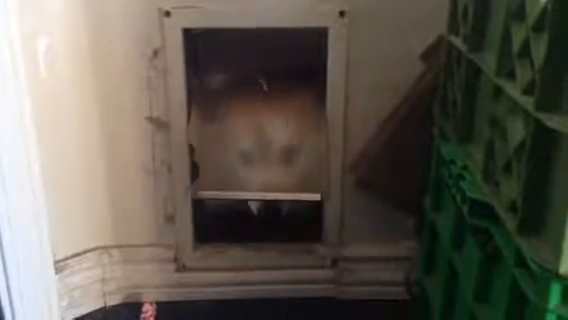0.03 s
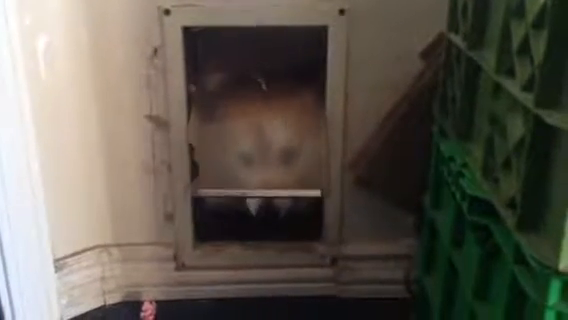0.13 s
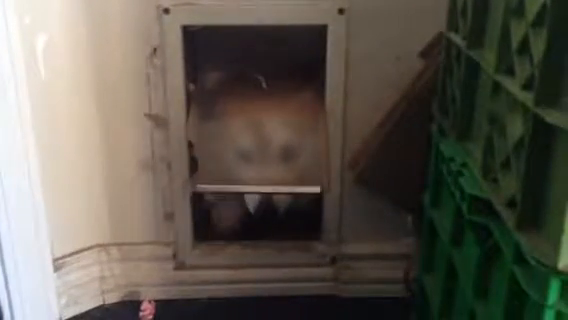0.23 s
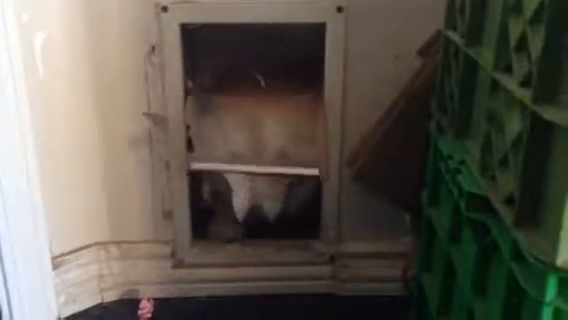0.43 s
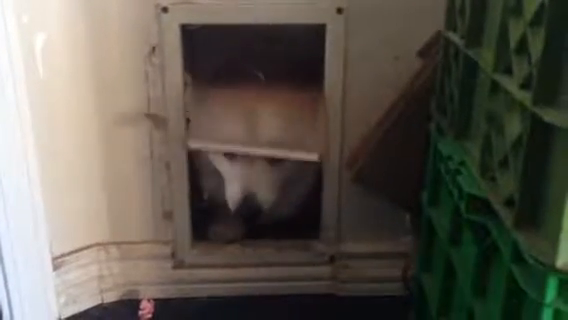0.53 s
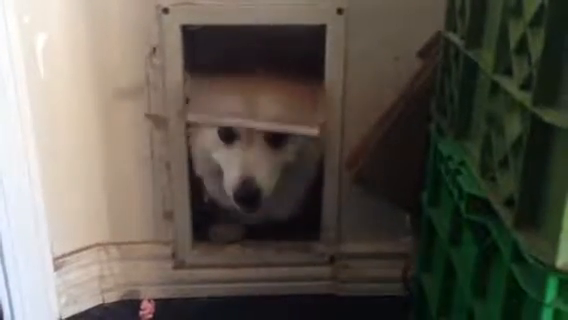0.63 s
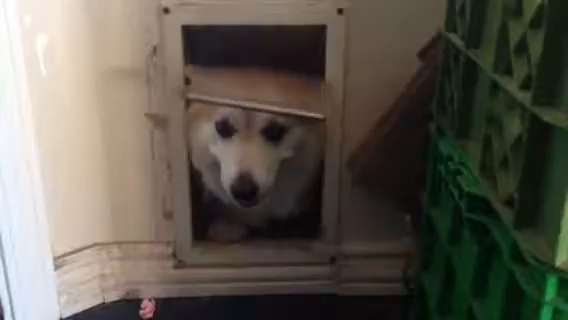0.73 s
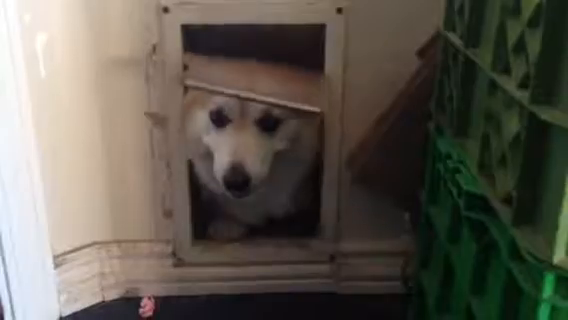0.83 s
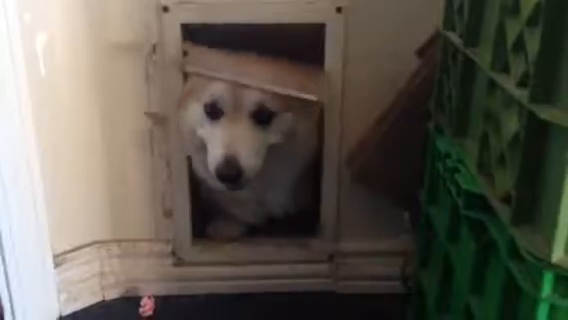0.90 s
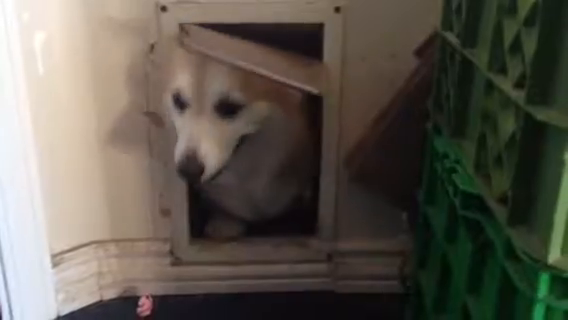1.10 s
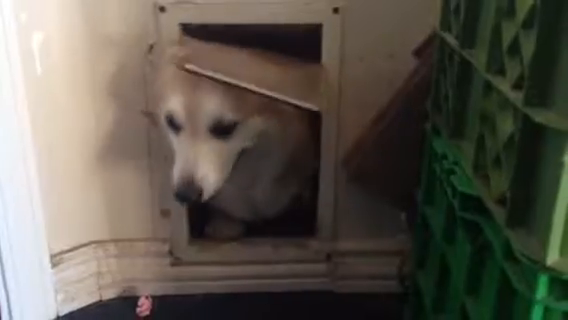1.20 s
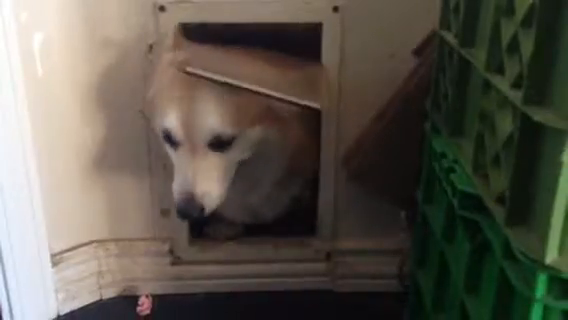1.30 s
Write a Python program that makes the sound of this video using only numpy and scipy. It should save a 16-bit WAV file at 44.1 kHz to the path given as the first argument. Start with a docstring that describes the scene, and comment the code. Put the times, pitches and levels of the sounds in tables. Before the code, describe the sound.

A plastic pet door clacks close by in a small hallway as a dog pushes through. Quick clicks build to a bright snap at 0.25 seconds, then a hard clack comes at 0.4. Lighter rattles, soft thuds and fur brushes follow until about 1.3 seconds. A distant crow gives two faint, raspy caws, near 0.3 and 0.8 seconds, over very quiet outdoor air.

```python
"""A dog pushes its head through a plastic pet door in a small hallway, over faint outdoor air.
The flap ticks, fur brushes the frame, the door panel thuds, and the catch snaps free (0.24 s).
A distant crow starts a rasping caw; the flap clacks on its frame (0.37 s) and rattles as the dog
bumps the panel again. The crow caws once more (0.84 s), and the last soft bumps and brushes follow."""
import sys
import numpy as np
from scipy import signal
from scipy.fft import rfft, irfft
from scipy.io import wavfile
from scipy.ndimage import uniform_filter1d

SR = 44100
rng = np.random.default_rng(int(sys.argv[2]) if len(sys.argv) > 2 else 0)


def master_out(mix):
    """Clip the mix to full scale and print it as 16-bit PCM to the path in sys.argv[1]."""
    frames = np.transpose(np.atleast_2d(mix))
    ceiling = np.clip(frames, -1, 1)
    pcm = np.round(ceiling * 32767).astype(np.int16)
    wavfile.write(sys.argv[1], SR, pcm)


N = 59535


def amp(db):
    """Decibels to gain."""
    return 10 ** (np.asarray(db) / 20)


def unit_rms(x):
    """Normalises to an rms of one."""
    return x / np.sqrt(np.mean(x ** 2) + 1e-20)


def curve_at(points, hz):
    """Reads a curve on a log-frequency axis."""
    f, value = np.transpose(points)
    return np.interp(np.log(hz + 1), np.log(f + 1), value)


def add(mix, start_s, sound):
    """Drops a sound into the mix."""
    part = mix[max(round(start_s * SR), 0):][:len(sound)]
    part += sound[:len(part)]


def eq(x, curve, size=4096):
    """Minimum-phase EQ with unit power gain: the curve sets only the tone."""
    gain = unit_rms(amp(curve_at(curve, abs(np.fft.fftfreq(size, 1 / SR)))))
    response = np.exp(np.conj(signal.hilbert(np.log(gain))))
    taps = np.fft.ifft(response).real[:size // 2]
    return signal.fftconvolve(x, taps)[:len(x)]


def noise():
    """White noise as long as the scene."""
    return rng.standard_normal(N)


def wander(hz):
    """Smooth random modulator, moving at up to about hz."""
    lowpass = np.exp(-(np.fft.rfftfreq(N, 1 / SR) / hz) ** 2)
    return unit_rms(irfft(rfft(noise()) * lowpass, N))


def reverb(x, t60s, predelay_s):
    """Diffuse reflections of unit energy, each band dying at its own speed."""
    hz, t, bands = signal.stft(noise()[:SR // 2], SR, nperseg=128)
    fade = amp(-60 * t / curve_at(t60s, hz)[:, None])
    tail = signal.istft(bands * fade, SR, nperseg=128)[1]
    out = np.zeros(N)
    add(out, predelay_s, signal.fftconvolve(x, tail / np.linalg.norm(tail)))
    return out


def decay(t, t60):
    """Envelope falling 60 dB in t60 seconds."""
    return np.exp(-np.log(1000) * t / t60)


def ring(modes, t):
    """Sum of decaying modes."""
    return sum(amp(db) * decay(t, t60) * np.cos(2 * np.pi * hz * t) for hz, db, t60 in modes)


def plastic(hits, modes, crack_eq, snap_db, snap_t60, crack_db, crack_t60, rise_s):
    """Each hit layers a sharp snap, a short crack and ringing modes; soft contacts are duller."""
    out, t = np.zeros(N), np.arange(SR // 4) / SR
    body = ring(modes, t) * (1 - np.exp(-(t / rise_s) ** 2))
    envelope = np.hypot(amp(snap_db) * decay(t, snap_t60), amp(crack_db) * decay(t, crack_t60))
    for start_s, db, cutoff_hz, ring_db in hits:
        burst = eq(rng.choice([-1., 1.], len(t)) * envelope, crack_eq)
        lowpass = signal.butter(2, min(cutoff_hz, SR / 2 - 1), fs=SR)
        add(out, start_s, amp(db) * signal.lfilter(*lowpass, amp(ring_db) * body + burst))
    return out


# tone of the background bed: f/Hz, level/dB
AIR_EQ = [(25, -26), (60, 0.5), (110, -13.5), (180, 5.5), (300, -2.5), (500, -2.5), (900, -12.5),
          (2000, -15.5), (4000, -12.5), (8000, -16), (15000, -18.5)]

def air(level_db=-64, drift_db=1.46):
    """Low outdoor murmur of air and a thin hiss, drifting in patches."""
    bands = signal.stft(noise(), nperseg=1024)[2]
    patches = uniform_filter1d(rng.standard_normal(bands.shape), size=8, axis=0)  # across frequency
    patches = unit_rms(uniform_filter1d(patches, size=6, axis=1))  # across time
    bed = signal.istft(bands * amp(drift_db * patches), nperseg=1024)[1][:N]
    return amp(level_db) * eq(bed, AIR_EQ)


# flap hits: t/s, level/dB, low-pass f/Hz, ring level/dB
FLAP_HITS = [(0.1265, -33.5, 5000, -14), (0.3636, -21.5, 16000, -13), (0.3688, -1.5, 13800, 1),
             (0.4112, -21.5, 14000, -9), (0.4595, -18.5, 2330, -1), (0.6743, -18, 2800, -2),
             (0.8035, -34, 2500, -4)]
# ringing modes of the flap: f/Hz, level/dB, t60/s
FLAP_RING = [(477, -34, 0.056), (604, -31, 0.046), (885, -44, 0.13), (1030, -30.5, 0.042),
             (1386, -42, 0.087), (1596, -39.5, 0.071), (1967, -26.5, 0.032), (2530, -30, 0.054),
             (2658, -34.5, 0.088), (2855, -43, 0.12), (3170, -46, 0.04), (3440, -1, 0.0056),
             (3674, -11, 0.0069), (6445, -19.5, 0.013)]
# its crack, the dense, quickly damped modes: f/Hz, level/dB
FLAP_EQ = [(80, -43), (200, -24.5), (370, -29), (520, -9), (750, -2), (1100, 3.5), (2200, -1.5),
           (2900, 3.5), (3500, -4.5), (5200, -5.5), (6500, -6), (8200, -3.5), (11000, -17), (15000, -19)]

def flap():
    """The plastic flap strikes its frame: one hard clack among lighter rattles."""
    return plastic(FLAP_HITS, FLAP_RING, FLAP_EQ, snap_db=-18.5, snap_t60=0.0068,
                   crack_db=-34.5, crack_t60=0.069, rise_s=0.0016)


# brush strokes: t/s, length/s, rub level/dB, hiss level/dB
FUR_STROKES = [(0.128, 0.038, -70, -75), (0.2, 0.091, -56, -63), (0.624, 0.033, -60.5, -74),
               (0.644, 0.056, -55, -68.5), (1.255, 0.054, -59.5, -67.5), (1.299, 0.043, -79, -67.5)]
# tone of the low rub: f/Hz, level/dB
RUB_EQ = [(60, -25), (160, 1), (500, -1.5), (900, -6), (1800, -12), (4000, -24)]
# tone of the light hiss: f/Hz, level/dB
HISS_EQ = [(500, -10), (1500, 5), (3500, 7), (6000, 0), (9500, 2.5), (12000, -16), (15000, -28)]

def fur(grain_db=2.5):
    """Fur and paws brush the frame in grainy strokes, a hiss layered over a rub."""
    out = np.zeros(N)
    for start_s, length, rub_db, hiss_db in FUR_STROKES:
        grains = unit_rms(noise() * amp(grain_db * wander(270)))
        stroke = amp(rub_db) * eq(grains, RUB_EQ) + amp(hiss_db) * eq(grains, HISS_EQ)
        swell = signal.windows.tukey(int(length * SR), .5)
        add(out, start_s, stroke[:len(swell)] * swell)
    return out


# soft bumps on the door panel: t/s, level/dB, contact time/s
PANEL_BUMPS = [(0.151, -6, 0.0023), (0.222, -12, .001), (0.242, -12.5, 0.00052), (0.635, -1, 0.0036),
               (0.642, 4.5, 0.0062), (0.676, -4.5, .0014), (0.991, -10, 0.0046), (1.139, -5, 0.0083),
               (1.158, -4.5, 0.006), (1.263, -19.5, 0.0011), (1.312, -12.5, 0.0013)]
# ringing modes of the panel: f/Hz, level/dB, t60/s
PANEL_RING = [(139.8, -50, 0.154), (183.3, -55.5, 0.22), (200.2, -51, 0.3), (295, -50.5, 0.19),
              (352, -73.5, 0.16), (473, -45, 0.052), (628, -53, 0.21), (711, -52.5, 0.21)]

def panel():
    """Soft pushes make the door thud; longer contact sounds duller."""
    out, t = np.zeros(N), np.arange(SR // 3) / SR
    body = ring(PANEL_RING, t)
    for start_s, db, contact_s in PANEL_BUMPS:
        push = t * np.exp(-2 * np.pi * t / contact_s)
        add(out, start_s, amp(db) * signal.fftconvolve(body, push / push.sum()))
    return out


# catch clicks: t/s, level/dB, low-pass f/Hz, ring level/dB
CATCH_HITS = [(0.2085, -22, 4000, -23), (0.2165, -23, 5000, -14), (0.2326, -16.5, 8700, -11),
              (0.2358, -9.5, 12100, -4), (0.2398, -19, 5960, 8), (0.2433, 0.5, 15700, -1),
              (0.2476, -2.5, 16300, 3)]
# ringing modes of the catch: f/Hz, level/dB, t60/s
CATCH_RING = [(2230, -36.5, 0.015), (2996, -36.5, 0.023), (3146, -38.5, 0.034), (3930, -30.5, 0.012),
              (4290, -38.5, 0.028), (5210, -38.5, 0.016), (5570, -29, 0.013), (6740, -37, 0.022),
              (8250, -44, .025), (4260, -31, 0.0049), (5520, -24.5, .006)]
# its crack, the dense, quickly damped modes: f/Hz, level/dB
CATCH_EQ = [(200, -38), (600, -13), (1200, -25.5), (2000, -3), (2700, -8), (3400, 5), (4700, -4), (5600, 0),
            (6500, -13.5), (8400, -7.5), (11000, -16), (15000, -23)]

def catch():
    """The catch slips free in a tight run of clicks that builds to a bright snap."""
    return plastic(CATCH_HITS, CATCH_RING, CATCH_EQ, snap_db=-27.5, snap_t60=0.0039,
                   crack_db=-30.5, crack_t60=0.035, rise_s=0.00028)


# caws: t/s, length/s, level/dB, top pitch f/Hz, opening roughness/0-1
CROW_CAWS = [(0.29, .375, -57, 545.3, 0.42), (0.835, .32, -56, 580, 0.14)]
# pitch envelope of a caw: share of its length, share of top pitch
CAW_PITCH = [(0, 0.58), (.06, 0.74), (.14, 0.91), (.2, 1), (.31, 1), (.38, 0.82), (.5, .86), (.66, 0.62),
             (.8, 0.8), (1, 0.87)]
# formants of the crow's throat: f/Hz, level/dB
THROAT_EQ = [(400, -39), (900, -21), (1150, -5.5), (1420, 3), (1680, 0), (1920, -7), (2140, -1.5),
             (2450, -16.5), (2900, -13), (3150, -16), (3520, -9), (4000, -21), (4700, -14.5), (5400, -19),
             (6050, -14), (7500, -25), (12000, -36)]
# reverb decay of the yard: f/Hz, t60/s
YARD_DECAY = [(500, 0.35), (1500, 0.34), (6000, 0.35)]

def crow(attack_s=0.046, release_s=0.0095, sag_db=-7, rasp_hz=65.36, rasp_depth=0.67, yard_db=-0.5):
    """Arching pulses, ever more ragged and beating with a rasp, pass the throat and cross the yard."""
    out, t = np.zeros(N), np.arange(N) / SR
    for start_s, length, db, top_hz, rough_start in CROW_CAWS:
        progress = np.minimum(t / length, 1)
        jitter = np.interp(progress, [0, 1], [0.01267, 0.0684]) * wander(142)
        hz = top_hz * np.interp(progress, *np.transpose(CAW_PITCH)) * (1 + jitter)
        cycles = np.cumsum(hz) / SR
        pulses = unit_rms(sum(np.cos(2 * np.pi * k * cycles) for k in range(1, 20)))
        rasp_cycles = np.cumsum(rasp_hz * (1 + .3 * wander(59))) / SR
        rasp = 1 + rasp_depth * np.sqrt(progress) * np.sin(2 * np.pi * rasp_cycles)
        rough = np.interp(progress, [0, 1], [rough_start, 0.93])  # noise's share of the power
        voice = np.sqrt(1 - rough) * pulses + np.sqrt(rough) * noise()
        fades = np.clip(t / attack_s, 0, 1) * np.clip((length - t) / release_s, 0, 1)
        add(out, start_s, amp(db + sag_db * progress) * fades * rasp * voice)
    caws = eq(out, THROAT_EQ)
    return caws + amp(yard_db) * reverb(caws, YARD_DECAY, predelay_s=.012)


# reverb decay of the hallway: f/Hz, t60/s
HALL_DECAY = [(150, 0.38), (600, .24), (1500, 0.9), (2700, 0.52), (5000, 0.2), (12000, 0.17)]

def scene(near_db=-9, near_t60=0.015, hall_db=-17.5):
    """Mono mix: the plastic slaps off near walls, the whole door feeds the hall; crow and air behind."""
    clacks = catch() + flap()
    door = clacks + panel() + fur()
    near_walls = amp(near_db) * reverb(clacks, [(1000, near_t60)], predelay_s=0.0038)
    hallway = amp(hall_db) * reverb(door, HALL_DECAY, predelay_s=.008)
    return (door + near_walls + hallway + crow() + air())[None]


def record(dry, low_cut_hz=101, high_cut_hz=15300):
    """The microphone's bass roll-off, then a steep high cut."""
    low_cut = signal.butter(3, low_cut_hz, "high", fs=SR, output="sos")
    high_cut = signal.firwin(511, high_cut_hz, window=("kaiser", 9), fs=SR)
    return signal.oaconvolve(signal.sosfilt(low_cut, dry), high_cut[None], "same")


dry = scene()
out = record(dry)
master_out(out)
```